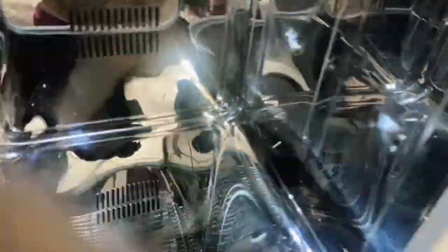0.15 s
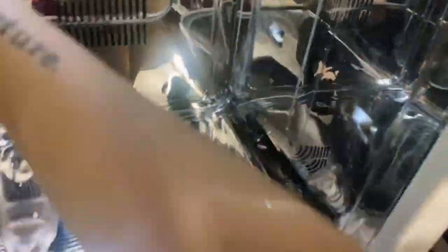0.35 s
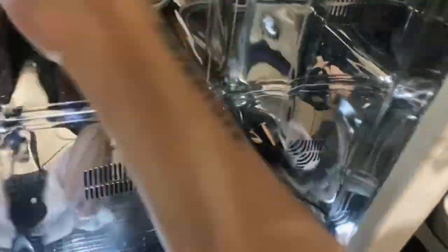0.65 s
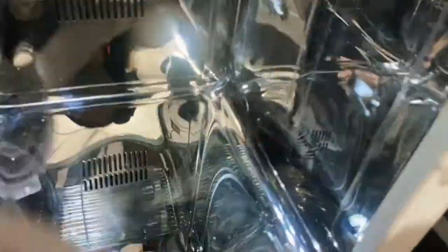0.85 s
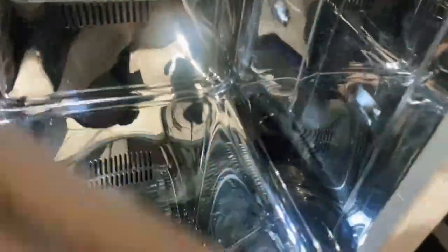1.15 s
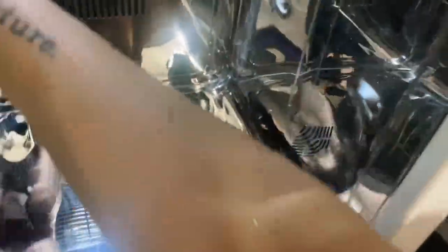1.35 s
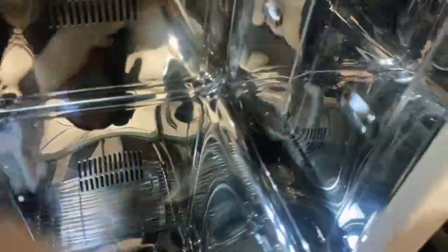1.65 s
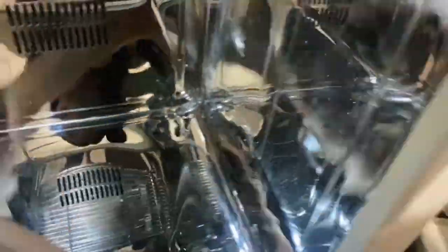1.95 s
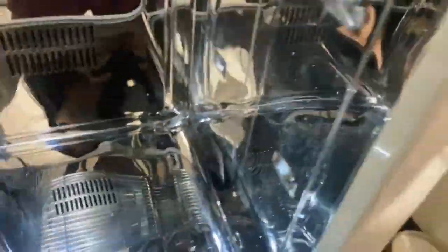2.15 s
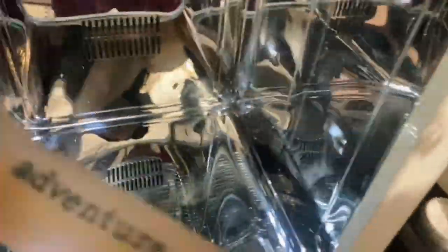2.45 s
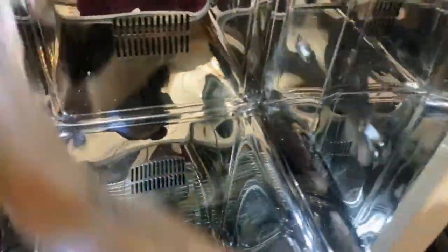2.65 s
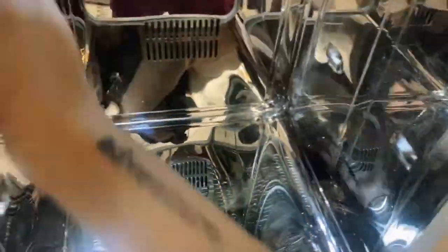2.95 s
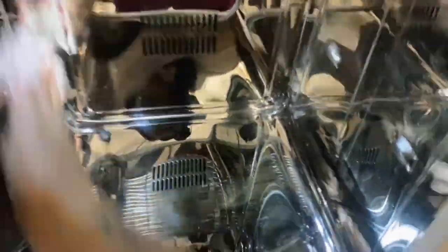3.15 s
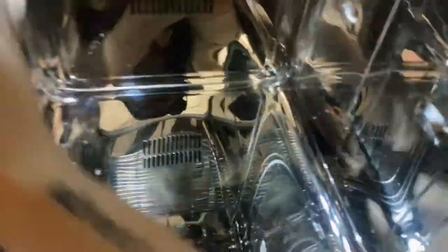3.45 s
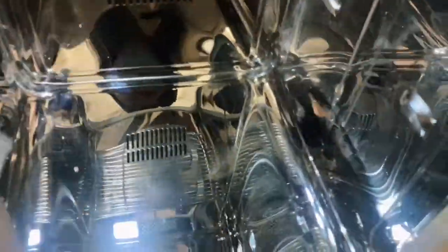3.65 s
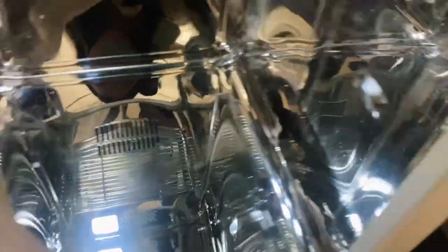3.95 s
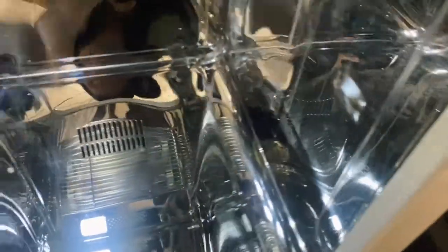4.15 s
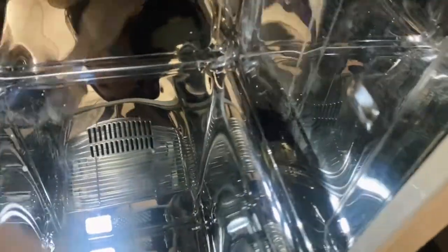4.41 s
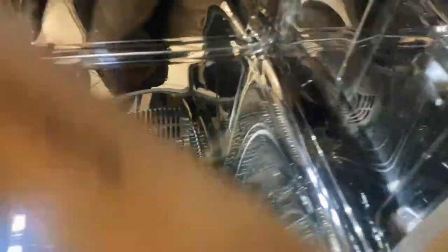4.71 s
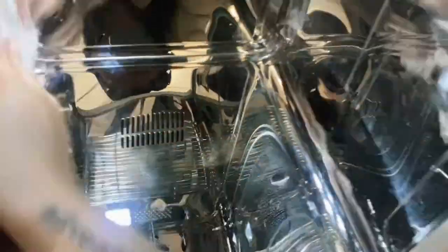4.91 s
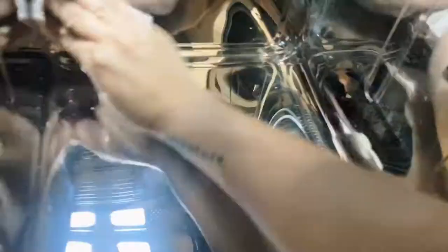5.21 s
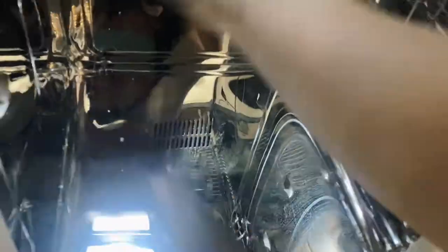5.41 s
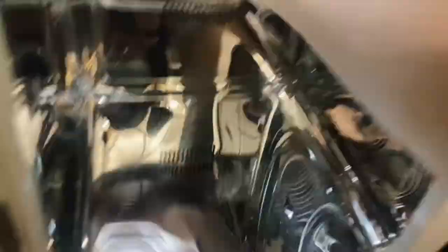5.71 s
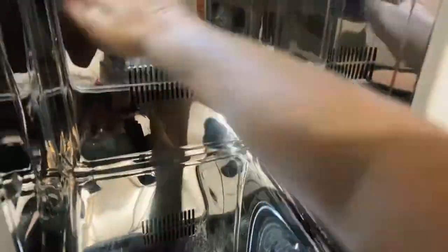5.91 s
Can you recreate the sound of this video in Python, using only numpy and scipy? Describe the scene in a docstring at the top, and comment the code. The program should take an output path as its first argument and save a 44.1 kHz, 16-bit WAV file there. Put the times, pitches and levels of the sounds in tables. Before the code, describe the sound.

A dry cloth scrubs inside a hollow steel cabinet, with soft booming bumps, sharp taps and one hard, close knock.

```python
"""A dry cloth scrubs the inside of a steel cabinet: it sticks and slips, so it rubs and hisses.
The hand bumps the thin walls, which boom, and sharp taps tick on the steel.
One hard knock overloads the microphone; a second later come a dull thud and a short clatter.
The microphone moves with the person wiping and rumbles softly over the quiet air of the room."""
import sys
import numpy as np
from scipy import signal
from scipy.fft import rfft, irfft
from scipy.io import wavfile
from scipy.ndimage import uniform_filter1d

SR = 44100
rng = np.random.default_rng(int(sys.argv[2]) if len(sys.argv) > 2 else 0)


def waveform_to_disk(signal):
    """Save audio, clipped to [-1, 1], as 16-bit WAV at the path in sys.argv[1]."""
    frames = np.transpose(np.atleast_2d(signal))
    scaled = np.clip(frames, -1, 1) * 32767
    samples = np.round(scaled).astype(np.int16)
    wavfile.write(sys.argv[1], SR, samples)


N = 267755
TIME = np.arange(N) / SR
AFTER = TIME[:SR // 2]  # seconds since a blow


# The hollow tone of cloth rubbing on steel: f/Hz, level/dB
RUB_TONE = [(50, -49), (110, 11.5), (190, 2), (290, 9), (500, -2), (660, -6), (790, -33.5), (1100, -17.5),
            (1400, -49), (1750, -37), (2900, -39), (4400, -41), (5600, -31), (15000, -54)]
def cloth(ring_db=-6, grip_db=5.5, spots=12):
    """Fibres catch and let go; the slips make a hollow rub and a ring that shifts as the hand moves."""
    drift = uniform_filter1d(uniform_filter1d(rng.standard_normal(N), size=700), size=400)
    grip = gain(grip_db * unit_level(drift))
    motion = 0.43 + speed()  # some rubbing is left while the hand turns round
    slips = random_slips(per_s=1800, spread_db=2) * grip * gain(USUAL_PRESS_DB + pressure(TIME)) * motion
    out = through(slips, unit_energy(response(RUB_TONE)))
    place = (TIME * 10).astype(int) % spots  # the next spot every tenth of a second
    for spot in range(spots):
        ring = unit_energy(wall_ring(600, 2500, detune=0.019))
        out += through(slips * (place == spot), ring) * gain(ring_db)
    return out


# The bright tone of the cloth's hiss, also used for ticks: f/Hz, level/dB
HISS_TONE = [(800, 16.5), (2500, -11.5), (4500, -9), (6500, 4), (8200, -8.5), (10500, 5), (12500, 2),
             (15500, -38)]
def cloth_hiss(level_db=-69, fizz_db=-8, catch_db=2.2, press_share=.15):
    """The weave crackles and hisses with each stroke; its threads catch in clumps."""
    clumps = gain(catch_db * unit_level(uniform_filter1d(rng.standard_normal(N), size=250)))
    threads = unit_level(clumps * random_slips(per_s=5000, spread_db=3))
    hiss = unit_level(through(threads, response(HISS_TONE))) + gain(fizz_db) * threads
    return gain(level_db + press_share * pressure(TIME)) * speed() * hiss


# Single wipes, each timed at its fastest moment: t/s, level/dB, length/s
SINGLE_WIPES = [(3.625, 2, .076), (4.198, 4, 0.053), (4.338, -1, .09), (4.495, 3, 0.049), (4.696, -1, 0.13),
                (4.933, 3.5, 0.081), (5.324, -2, 0.061), (5.52, -15, 0.19), (5.835, 2.5, 0.027)]
def speed(first_s=-.045, round_trip_s=.2415, rounds=15, stroke_s=.045, out_db=-1, back_db=-3):
    """How fast the hand moves: steady scrubbing, lighter on the way back, then single wipes."""
    scrubbing = [(first_s + (k + phase) * round_trip_s, db, stroke_s)
                 for k in range(rounds) for phase, db in [(0, out_db), (.5, back_db)]]
    return sum(swell(*stroke) for stroke in scrubbing + SINGLE_WIPES)


USUAL_PRESS_DB = -55
# How hard the cloth is pressed, given as the strength of its rubbing: t/s, level/dB
HAND_PRESSURE = [(0, -43.5), (.17, -62), (.43, -48), (.57, -56), (.8, -48.5), (1.35, -49), (1.85, -56),
                 (2.35, -66), (2.85, -60), (3.28, -55), (3.75, -65.5), (4.7, -62), (5.12, -59.5),
                 (5.3, -52), (5.55, -41.5), (5.65, -70), (5.88, -51.5), (6.07, -68)]
def pressure(s):
    """How hard the hand presses at time s, in dB above its usual effort."""
    return np.interp(s, *np.transpose(HAND_PRESSURE)) - USUAL_PRESS_DB


# Soft bumps of the hand on a wall: t/s, level/dB, f/Hz of the boom
HAND_BUMPS = [(0.048, -34, 170), (0.242, -31.5, 167), (0.41, -29, 170), (0.759, -30, 177),
              (0.855, -31, 138), (0.967, -38, 137), (1.111, -29, 189), (1.366, -32, 184), (1.468, -37, 189),
              (1.616, -31, 184), (1.978, -32.5, 162), (2.021, -28.5, 154), (2.151, -38.5, 175),
              (2.444, -36, 142), (2.57, -27, 171), (2.676, -28, 170), (2.813, -31.5, 178),
              (2.934, -34.5, 171), (2.982, -27, 164), (3.079, -40, 183), (3.195, -33.5, 188),
              (3.231, -24.5, 182.5), (3.329, -32, 142), (3.462, -24, 142), (3.608, -32, 136.6),
              (3.905, -26, 132.5), (4.517, -29, 140), (4.588, -37, 176), (4.634, -28, 167.4),
              (5.354, -33, 131)]
def bumps(boom_db=-2, ring_db=-49, slap_db=-48, drag_s=0.038, fade_s=0.043, usual_db=-30):
    """The hand pats a wall. Each place booms at its own pitch; a firm hand wakes higher notes too."""
    out, pat = np.zeros(N), response(RUB_TONE)
    for s, db, hz in HAND_BUMPS:
        firm_db = 0.72 * pressure(s) + 0.92 * (db - usual_db)
        force = contact(drag_s, drag=7.1)
        flex = (1 - np.exp(-AFTER / 0.0039)) * fading_note(hz, 0, fade_s)
        boom = strike(contact(drag_s, drag=0.78), flex, db + boom_db)
        ring = strike(force, wall_ring(230, 650, detune=0.02), firm_db + ring_db)
        slap = strike(force, pat, firm_db + slap_db)
        add(out, s, boom + ring + slap)
    return out


# The notes of the part that is knocked: f/Hz, level/dB, time to fade by 60 dB/s
KNOCK_NOTES = [(80, -3, 0.049), (170, 3, 0.022), (360.5, -10, 0.04), (531, -3.5, 0.057), (730, -23, 0.0084),
               (938, -39, 0.14), (1300, -27, 0.0088), (1650, -31, 0.0043)]
# A hard knock near the microphone, and its bounce: t/s, level/dB
HARD_KNOCKS = [(4.051, 7), (4.0575, -1.5)]
def knocks(crack_db=-23, wall_db=-29):
    """A stiff part takes the blow and soon falls quiet; a thin high ping and the walls ring on."""
    out = np.zeros(N)
    part_ring = sum(fading_note(*note) for note in KNOCK_NOTES)
    for s, db in HARD_KNOCKS:
        ring = part_ring + gain(wall_db) * unit_peak(wall_ring(230, 2500))
        body = through(push(touch_s=0.00026), ring)
        rattle = through(contact(.008, drag=1.2), response(CRACK_TONE))
        crack = strike(rattle, push(touch_s=.00011), crack_db)
        add(out, s, -gain(db) * (body + crack))
    ping = fading_note(hz=4571, db=-54, fade_s=0.41)
    add(out, HARD_KNOCKS[0][0], ping)
    return out


# Two quick pushes on a wall, heard as one thud: t/s, level/dB, contact time/s
THUD_PUSHES = [(5.152, -15.5, 0.0038), (5.1585, -12, 0.0023)]
def thud():
    """A padded blow: the wall gives way with a short boom and a dull ring."""
    out = np.zeros(N)
    boom = fading_note(hz=165, db=8, fade_s=0.028)
    for s, db, touch_s in THUD_PUSHES:
        add(out, s, -strike(push(touch_s), boom + wall_ring(150, 2500, detune=.01), db))
    return out


# The tone of a hard crack on steel: f/Hz, level/dB
CRACK_TONE = [(200, 5), (600, 16.5), (760, 4.5), (1050, 0), (1350, -5.5), (1700, -1), (2100, -5.5),
              (3000, -6.5), (4400, -13), (6000, -20), (15000, -24.5)]
# Sharp taps on the steel, including the crisp start of some hand bumps:
# t/s, hit level/dB, low ring level/dB, treble level/dB
STEEL_TAPS = [(0.351, -46, -30, -58), (0.756, -43, -30.5, -63), (1.017, -54, -42, -64),
              (1.112, -52, -38, -70), (1.282, -37.5, -42, -67), (1.474, -55, -47, -81),
              (1.791, -30.5, -29.5, -53.5), (3.179, -48.5, -46, -60.5), (3.364, -59, -40, -70),
              (3.608, -57, -43, -77), (3.801, -37, -40.5, -78), (4.129, -41.5, -44, -63),
              (4.301, -62, -46.5, -64.5), (4.496, -58, -53, -65), (5.147, -44.5, -29.5, -78.5),
              (5.237, -23.5, -19.5, -67), (5.255, -33, -35, -59), (5.417, -49, -42, -66),
              (5.533, -44.5, -38.5, -63.5)]
def taps(slip_s=0.012):
    """Each sharp tap slips briefly: a crack, a ring from the wall and a bright, raspy tick."""
    out = np.zeros(N)
    for s, hit_db, ring_db, treble_db in STEEL_TAPS:
        force = contact(slip_s, drag=4.2)
        crack = strike(force, response(CRACK_TONE), hit_db - 4)
        low_ring = strike(force, wall_ring(330, 650), ring_db)
        high_ring = strike(force, wall_ring(650, 2400, detune=0.0083), hit_db - 8)
        tick = strike(force, response(HISS_TONE), treble_db - 3)
        rasp = strike(force, response(RASP_TONE), treble_db - 1)
        add(out, s, crack + low_ring + high_ring + tick + rasp)
    return out


def snaps(snap_db=-37, bright_tick_db=-50, growth=1.68, band_hz=(1800, 4600)):
    """The brightest of those taps add a crisp snap, which grows faster than their tick."""
    out, band = np.zeros(N), signal.butter(4, band_hz, "band", fs=SR)
    for s, _, _, treble_db in STEEL_TAPS:
        snap = unit_peak(signal.lfilter(*band, contact(.006, drag=2)))
        add(out, s, snap * gain(snap_db + growth * (treble_db - bright_tick_db)))
    return out


# The bright, raspy tone of scraped steel: f/Hz, level/dB
RASP_TONE = [(1500, -27.5), (2600, 9), (4400, 1.5), (5200, -11), (7000, -8), (12000, -11.5), (13800, -10),
             (15500, -22)]
# Gritty scuffs, each timed at its loudest moment: t/s, level/dB, length/s
STEEL_SCUFFS = [(.435, -63, 0.018), (0.645, -61.5, .014), (0.923, -48.5, 0.019), (1.317, -63, 0.029),
                (2.152, -63, 0.027), (3.246, -66, .06), (5.28, -49.5, 0.022)]
def scuffs(grit_db=2, ring_db=3, rasp_db=1):
    """A quick run of hard slips makes grit, a bright rasp and the wall's middle notes."""
    slips = random_slips(per_s=3000, spread_db=2) * sum(swell(*scuff) for scuff in STEEL_SCUFFS)
    tones = [(response(CRACK_TONE), grit_db),
             (wall_ring(650, 2400, detune=0.05), ring_db),
             (response(RASP_TONE), rasp_db)]
    return sum(gain(db) * through(slips, unit_energy(tone)) for tone, db in tones)


# The notes the steel walls ring with: f/Hz, level/dB, time to fade by 60 dB/s
WALL_NOTES = [(140, -4, 0.11), (191.2, -2.5, 0.16), (277, 0.5, 0.054), (347, 3.5, 0.019),
              (433.5, -1, 0.019), (496, -13, 0.18), (506, -35, 0.074), (732, 3, 0.019), (959, -16, 0.059),
              (1220, -4, 0.012), (1350, -7.5, 0.042), (1410, -21, 0.032), (2004, -11.5, 0.019),
              (2904, -11, 0.04), (3850, -15, 0.019), (4190, -26.5, 0.03)]
def wall_ring(low_hz, high_hz, detune=0.021, bass_cut_hz=115):
    """The wall's notes between two pitches; each spot that is touched rings a little differently."""
    ring = np.zeros(len(AFTER))
    for (hz, db, fade_s), shift in zip(WALL_NOTES, rng.standard_normal(len(WALL_NOTES))):
        if low_hz < hz < high_hz:
            ring += fading_note(hz * (1 + detune * shift), db, fade_s)
    bass_cut = signal.butter(2, bass_cut_hz, "high", fs=SR)  # a thin sheet gives off little deep bass
    return signal.lfilter(*bass_cut, ring)


# The deep rumble of the moving microphone: f/Hz, level/dB
RUMBLE_TONE = [(3, -20.5), (10, 8), (20, 2), (30, -20.5), (48, -12), (65, -26.5), (90, -24.5), (200, -64),
               (600, -110)]
# Jolts that rock the microphone: t/s, level/dB, f/Hz, rise time/s
MIC_JOLTS = [(4.058, -12, 16.9, 0.036), (4.103, -12.5, 22.64, 0.051), (4.155, -11.5, 38, 0.019),
             (5.241, -9, 109, 0.0032)]
def microphone_sway(rumble_db=-24):
    """The moving microphone rumbles, and swings on its mount after a jolt."""
    out = noise(RUMBLE_TONE) * gain(rumble_db) * signal.windows.tukey(N, .01)
    for s, db, hz, rise_s in MIC_JOLTS:
        swing = gain(db) * AFTER / rise_s * np.exp(1 - AFTER / rise_s)
        add(out, s, -swing * np.sin(2 * np.pi * hz * AFTER))
    return out


# How long the echo lasts at each pitch: f/Hz, time to fade by 60 dB/s
ECHO_FADE = [(100, 0.39), (500, 0.22), (1400, 0.087), (4000, 0.093), (12000, 0.11)]
def echo(x, rise_s=.004):
    """Sound bounces in and around the cabinet; the treble dies before the bass."""
    hz, t, bands = signal.stft(rng.standard_normal(len(AFTER)), SR, nperseg=256)
    fade = gain(-60 * t / look_up(ECHO_FADE, hz)[:, None])
    tail = signal.istft(bands * fade, SR, nperseg=256)[1][:len(AFTER)]
    tail *= 1 - np.exp(-AFTER / rise_s)
    return through(x, unit_energy(tail))


# The tone of the quiet room: f/Hz, level/dB
AIR_TONE = [(30, -21), (100, 8), (170, 19.5), (230, 0.5), (480, 11.5), (700, -2), (1100, -5.5), (2100, -6),
            (3200, -11), (4500, -12.5), (5200, -24), (9000, -24), (15500, -26.5)]
def room_air(level_db=-53):
    """A faint, steady hush behind everything."""
    return gain(level_db) * noise(AIR_TONE)


def contact(slip_s, drag):
    """The force of a first touch and a dying run of small slips, whose strength is drag."""
    slips = rng.standard_normal(len(AFTER)) * np.exp(-AFTER / slip_s)
    force = drag * unit_energy(slips)
    force[0] += 1
    return force


def push(touch_s):
    """The force of a rounded blow; a longer touch sounds duller."""
    force = np.sin(np.pi * np.minimum(AFTER / touch_s, 1)) ** 2
    return force / force.sum()


def strike(force, ring, db):
    """A force sets something ringing; the loudest moment has level db."""
    return unit_peak(through(force, ring)) * gain(db)


def fading_note(hz, db, fade_s):
    """A pure note that drops by 60 dB in fade_s seconds."""
    return gain(db - 60 * AFTER / fade_s) * np.sin(2 * np.pi * hz * AFTER)


def random_slips(per_s, spread_db):
    """Tiny clicks of uneven size at random times."""
    size = gain(spread_db * np.minimum(rng.exponential(1, N), 4))
    return unit_level(size * rng.choice([-1, 1], N) * (rng.random(N) < per_s / SR))


def swell(s, db, length):
    """A movement that speeds up and slows down around time s."""
    return gain(db) * np.exp(-2 * ((TIME - s) / length) ** 2)


def noise(tone):
    """Steady noise shaped by a tone table."""
    shape = gain(look_up(tone, np.fft.rfftfreq(N, 1 / SR)))
    return unit_level(irfft(rfft(rng.standard_normal(N)) * shape, N))


def response(tone, size=4096):
    """The sound of one click shaped by a tone table."""
    log_gain = np.log(gain(look_up(tone, abs(np.fft.fftfreq(size, 1 / SR)))))
    spectrum = np.exp(np.conj(signal.hilbert(log_gain)))  # nothing sounds before the click
    return np.fft.ifft(spectrum).real[:size // 2]


def look_up(table, hz):
    """Reads between a table's rows on a pitch (logarithmic) scale."""
    f, value = np.transpose(table)
    return np.interp(np.log(hz + 1), np.log(f + 1), value)


def through(x, ring):
    """Lets every sample of x start its own copy of a ring."""
    return signal.fftconvolve(x, ring)[:len(x)]


def add(mix, s, sound):
    """Mixes a sound in at time s."""
    part = mix[max(round(s * SR), 0):][:len(sound)]
    part += sound[:len(part)]


def gain(db):
    """Turns decibels into a factor."""
    return 10 ** (np.asarray(db) / 20)


def unit_level(x):
    """Scales the average (rms) level to one."""
    return x / np.sqrt(np.mean(x ** 2) + 1e-20)


def unit_peak(x):
    """Scales the level of the loudest few milliseconds to one."""
    return x / np.sqrt(uniform_filter1d(x ** 2, 256).max() + 1e-20)


def unit_energy(x):
    """Scales the total energy to one."""
    return x / np.linalg.norm(x)


def scene():
    """The cloth, the blows and their echo, over the rumble and the quiet room."""
    rubbing = cloth() + cloth_hiss()
    bumping = bumps() + thud()
    tapping = taps() + snaps() + scuffs()
    knocking = knocks()
    cleaning = rubbing + bumping + tapping
    echoes = echo(gain(-8.5) * cleaning + gain(-24) * knocking)
    return (cleaning + knocking + echoes + microphone_sway() + room_air())[None]


def record(dry, ceiling=.72, hardness=6, top_hz=15750):
    """The microphone squashes the hardest blow, and the highest treble is cut off."""
    squashed = dry / (1 + (dry / ceiling) ** hardness) ** (1 / hardness)
    treble_cut = signal.firwin(511, top_hz, window=("kaiser", 9), fs=SR)
    return signal.oaconvolve(squashed, treble_cut[None], "same")


dry = scene()
out = record(dry)
waveform_to_disk(out)
```